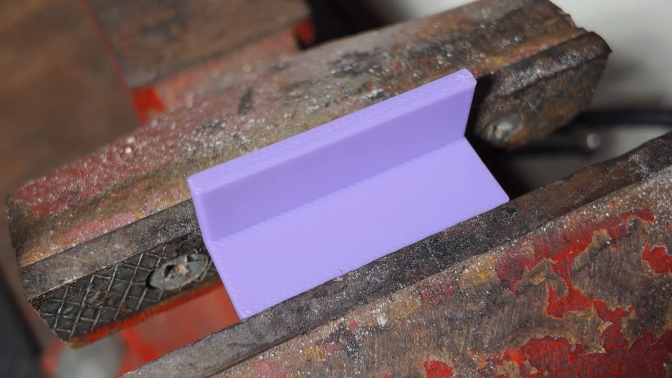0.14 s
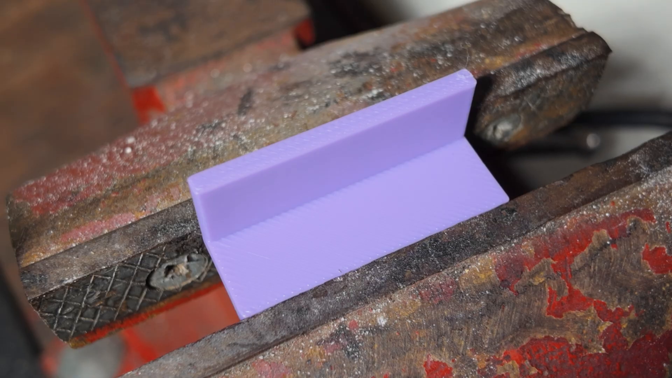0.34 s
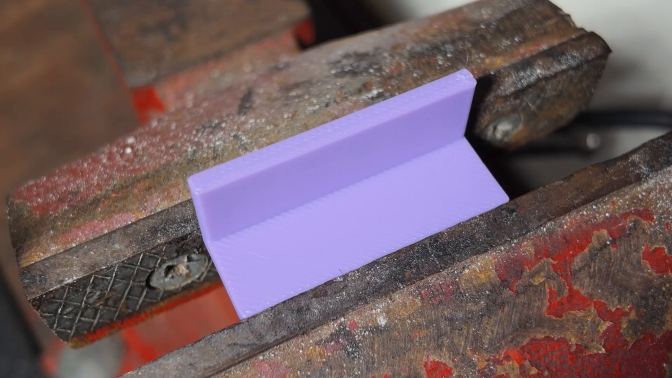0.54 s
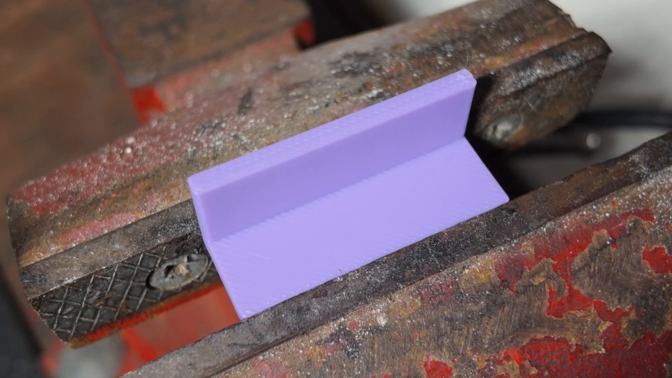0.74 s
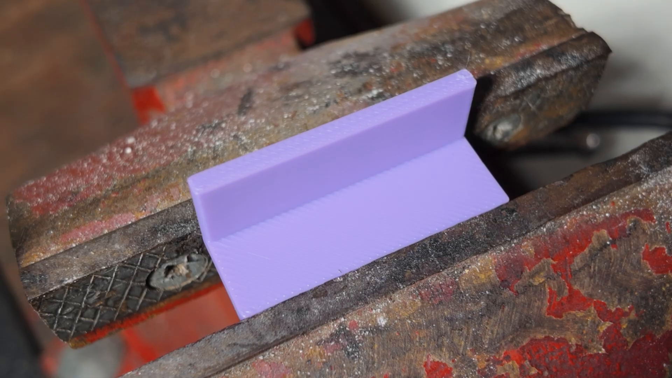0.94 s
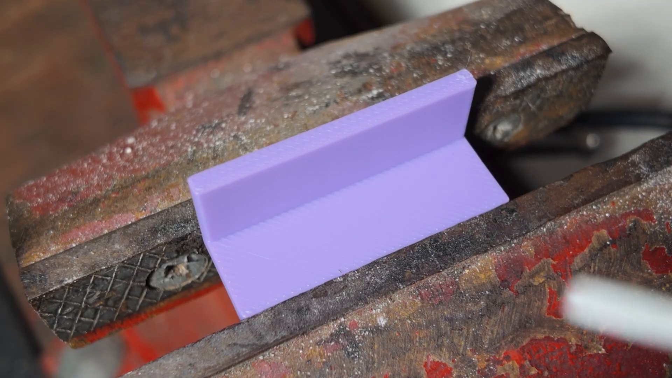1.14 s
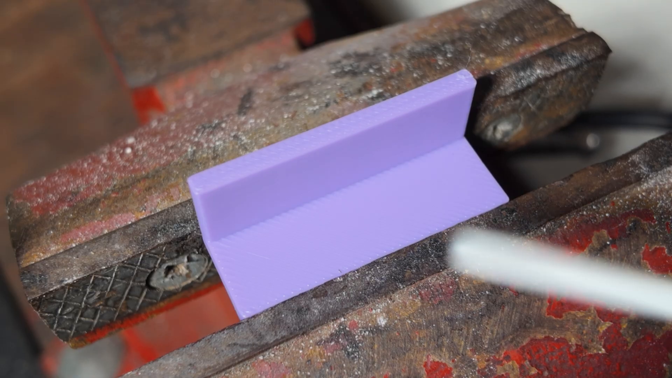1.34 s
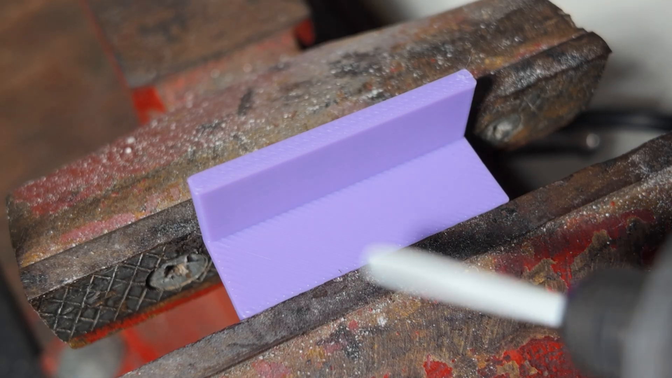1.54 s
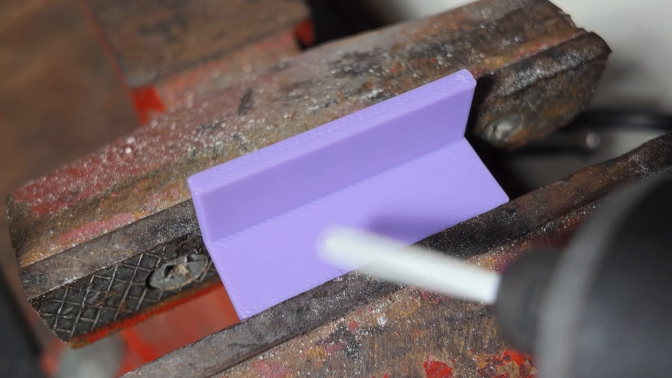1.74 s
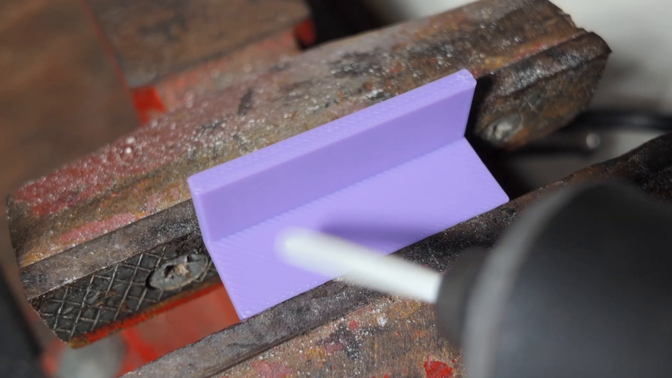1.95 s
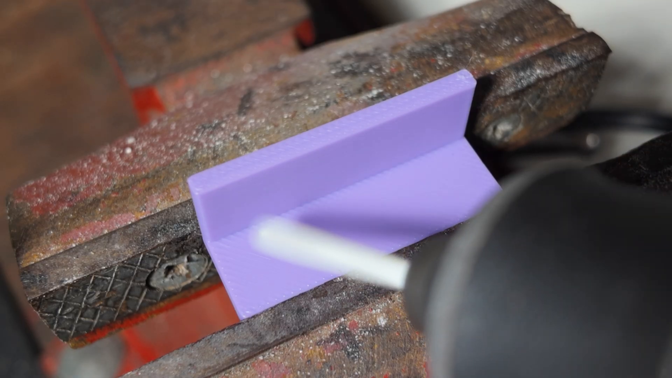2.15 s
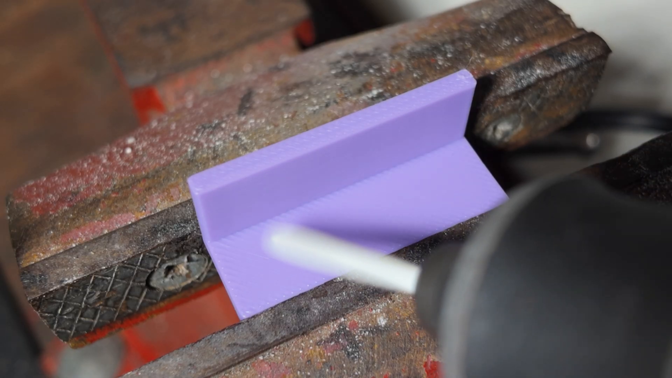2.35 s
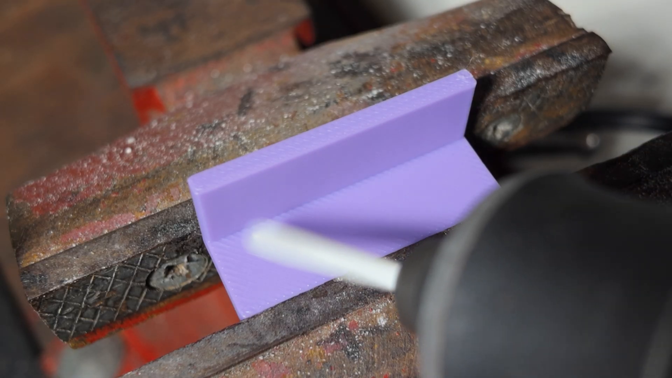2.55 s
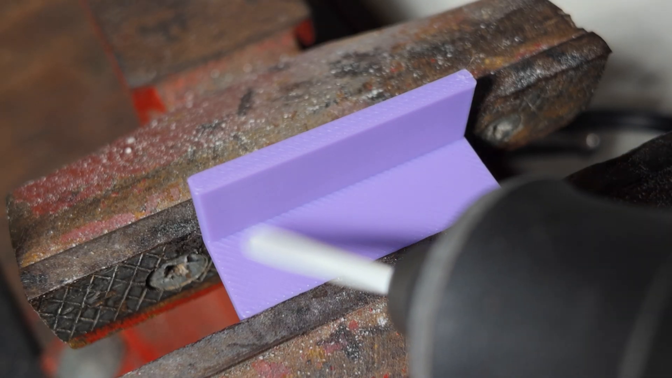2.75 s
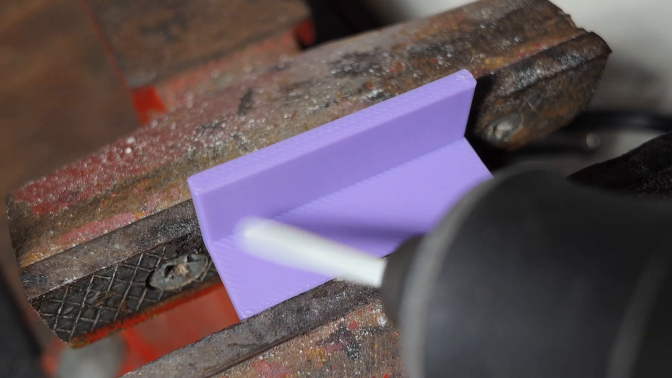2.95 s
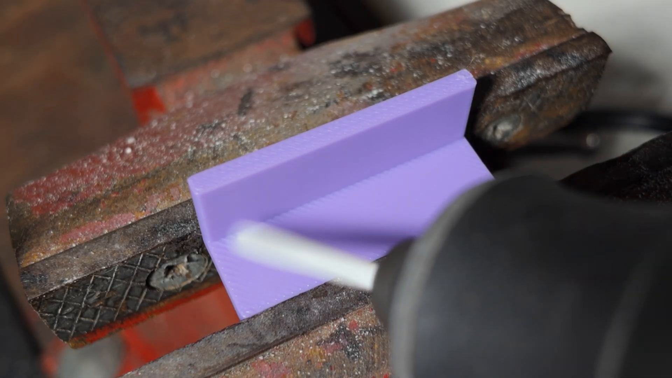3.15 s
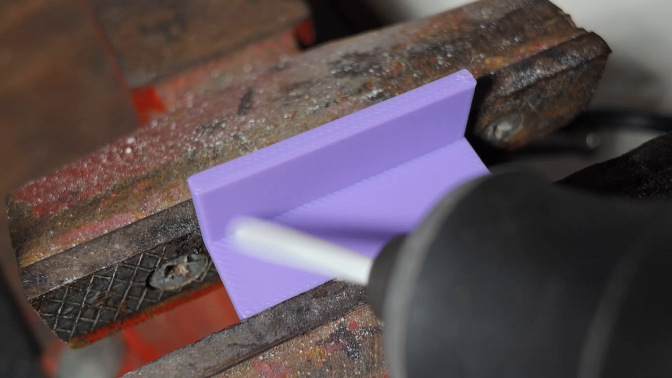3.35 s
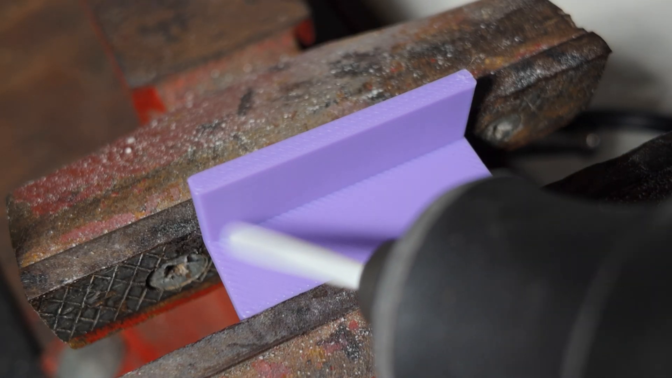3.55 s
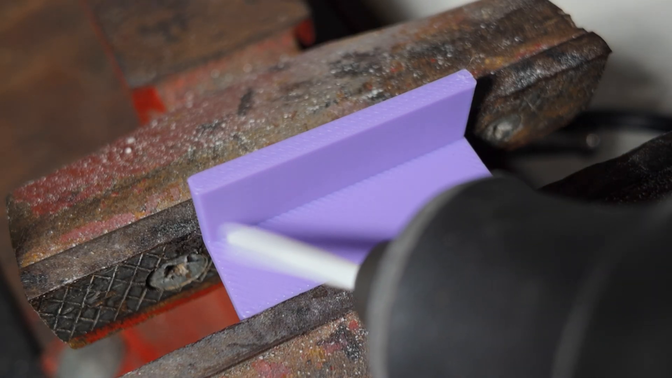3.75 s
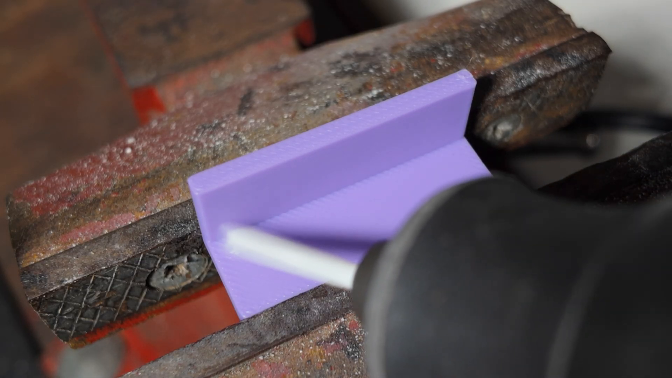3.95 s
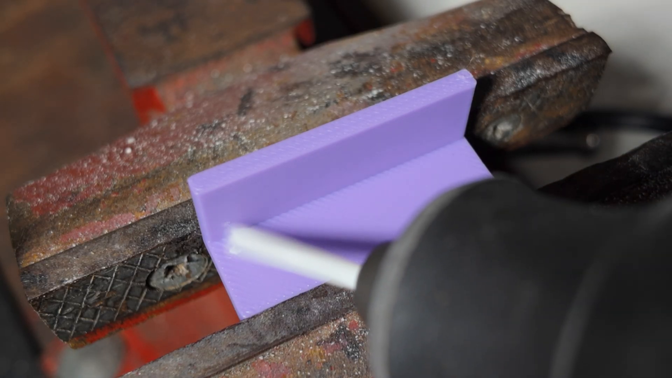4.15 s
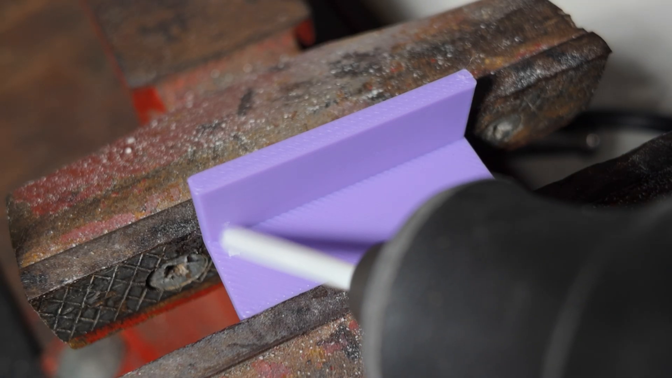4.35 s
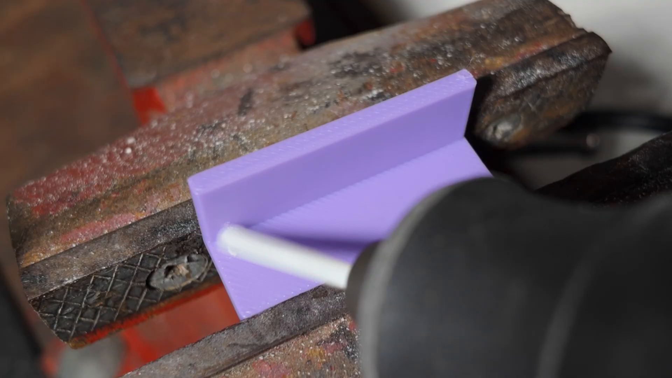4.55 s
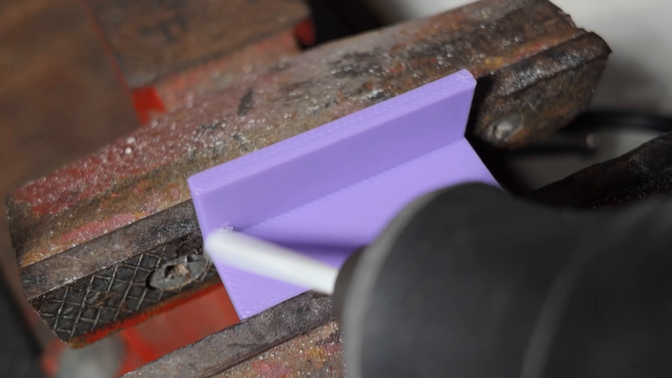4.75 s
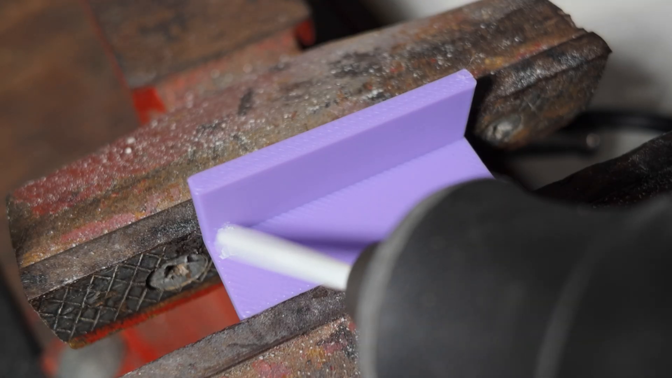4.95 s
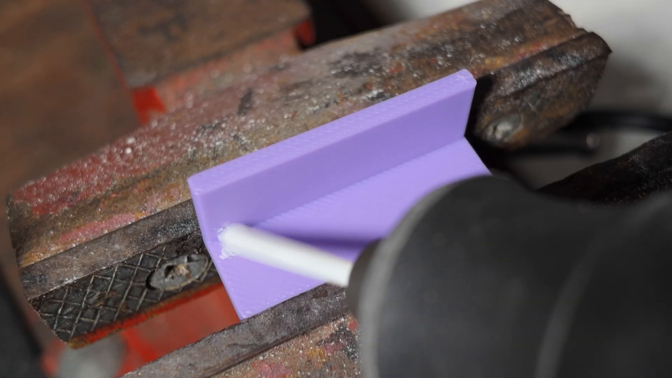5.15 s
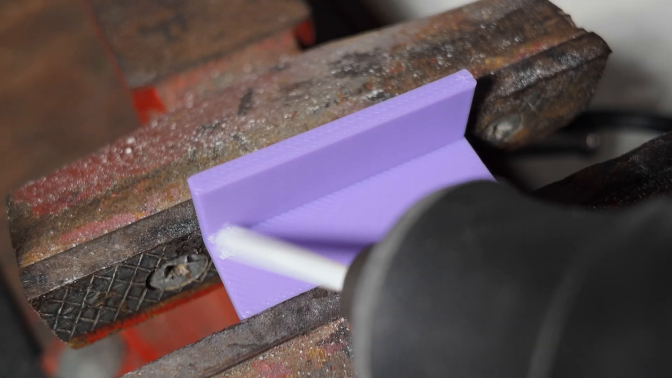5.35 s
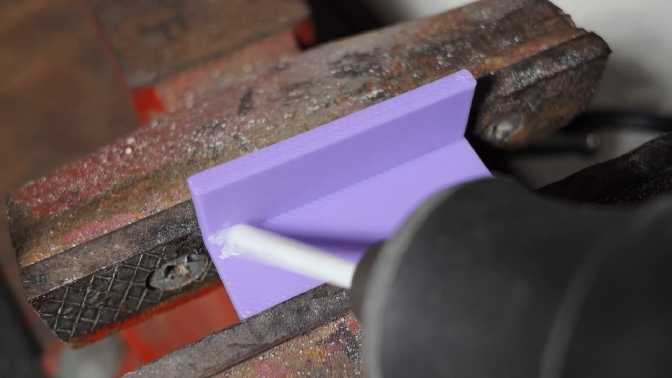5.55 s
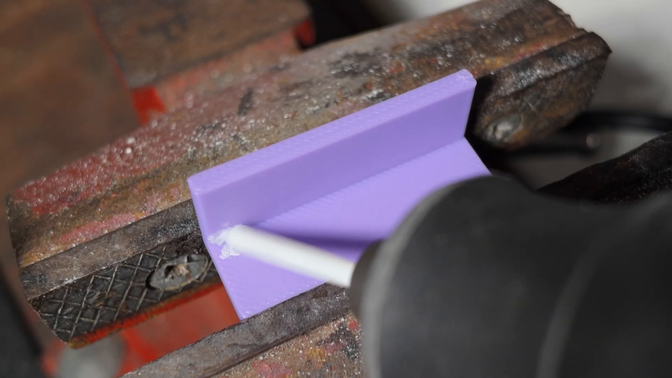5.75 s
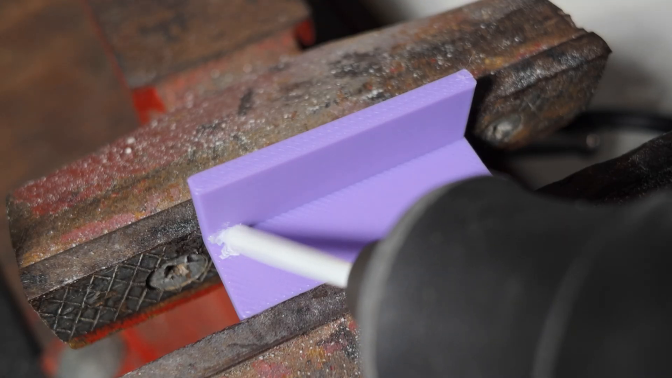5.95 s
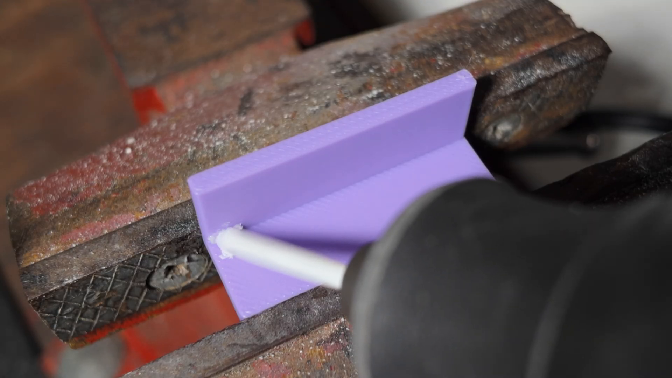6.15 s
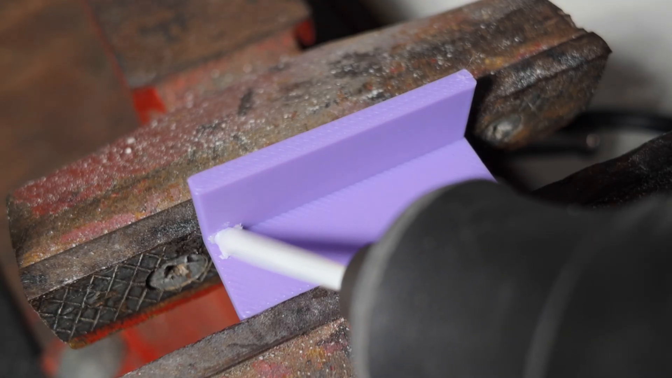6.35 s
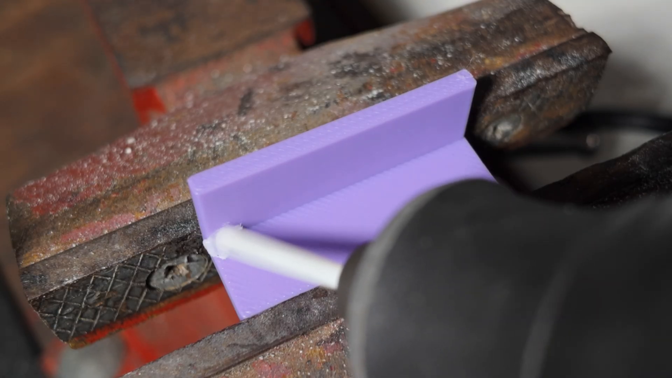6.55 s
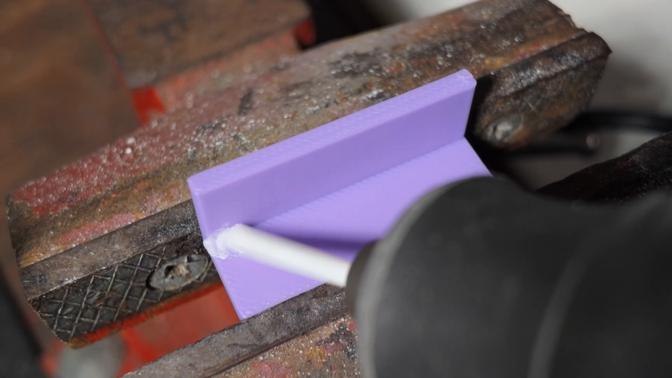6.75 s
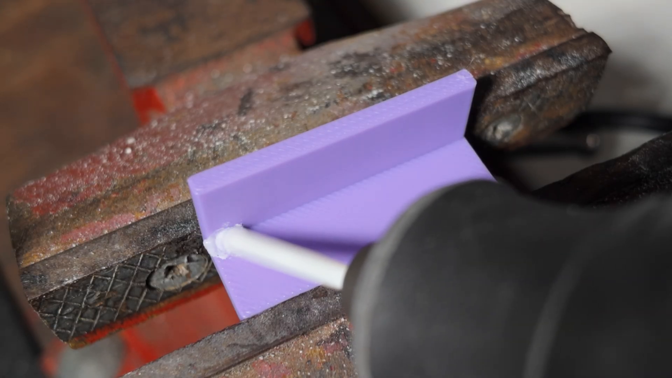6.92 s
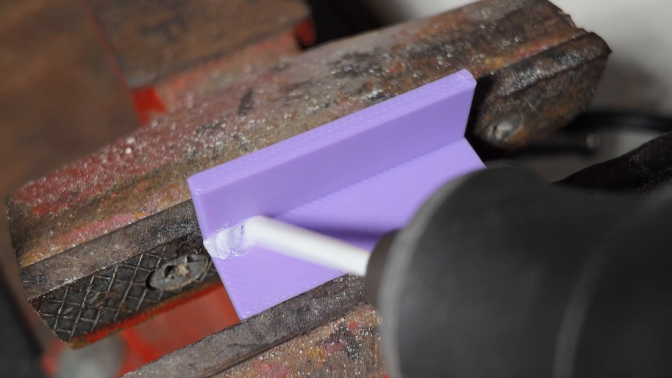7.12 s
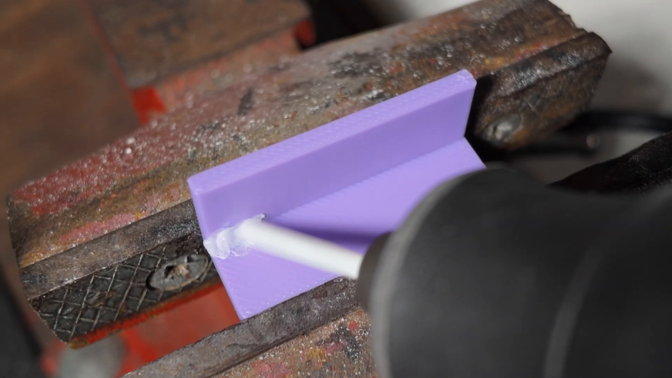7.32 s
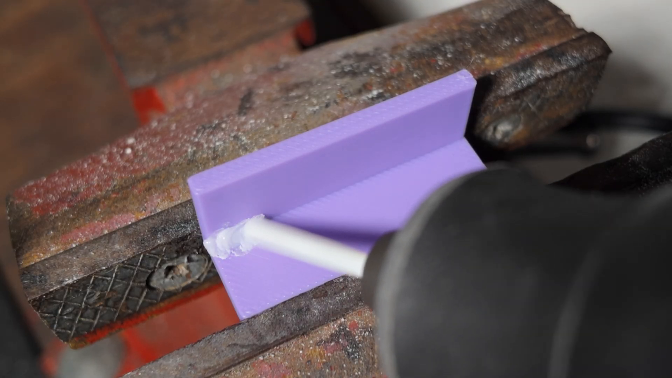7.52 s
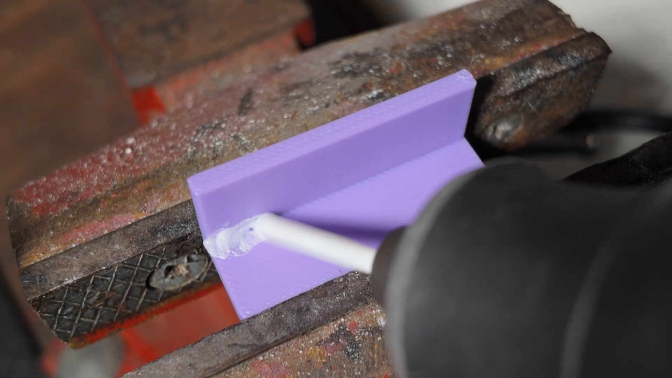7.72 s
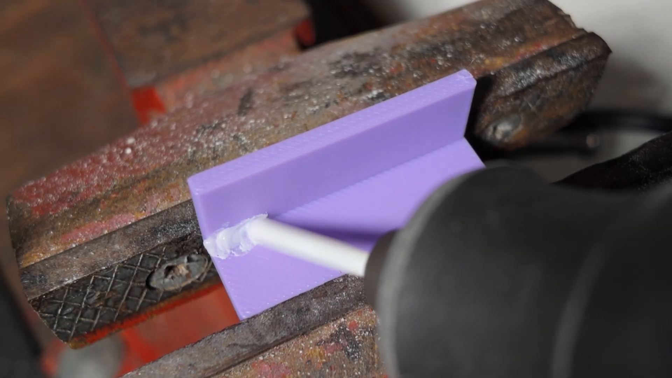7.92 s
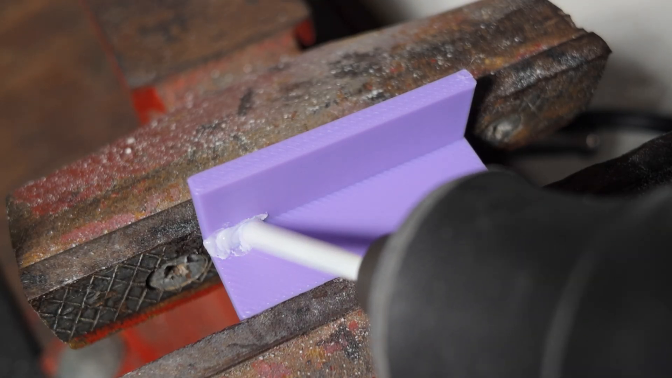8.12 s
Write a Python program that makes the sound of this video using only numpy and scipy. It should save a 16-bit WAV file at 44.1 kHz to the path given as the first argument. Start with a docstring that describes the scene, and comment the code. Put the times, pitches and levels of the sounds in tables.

```python
"""Rotary tool and plastic rod

A handheld rotary tool is gripped, clicked on and runs up to speed, close by in a quiet workshop.
Its speed control feeds the motor in bursts, twice a mains cycle, so the whine buzzes; its fan rushes.
The spinning plastic rod is pressed on a part in a vise: it squeals and scrapes, then softens and runs smoothly.
Tones are sines locked to the shaft's angle, rung through resonances; air and friction are filtered noise."""
import sys
import numpy as np
from scipy.fft import rfft, irfft, next_fast_len
from scipy.io import wavfile
from scipy.ndimage import uniform_filter1d, map_coordinates

SR = 44100
rng = np.random.default_rng(int(sys.argv[2]) if len(sys.argv) > 2 else 0)


def pcm_store(signal):
    """Save signal as 16-bit PCM."""
    levels = np.round(np.clip(np.atleast_2d(signal), -1, 1) * 32767)
    wavfile.write(sys.argv[1], SR, levels.astype(np.int16).T)


N = 365148

# governed shaft speed, sagging under the load: t/s, f/Hz (turns per second)
SPEED = [(1.05, 341.1), (1.39, 330.8), (1.57, 331.5), (1.77, 328.9), (1.93, 330.9), (2.24, 329.3),
         (2.4, 330.5), (2.78, 329.2), (2.82, 330.8), (3.06, 332.4), (4.05, 329.7), (4.19, 332.5),
         (4.41, 328.7), (5.01, 328.7), (5.34, 325.4), (5.7, 328.2), (5.86, 326.2), (5.96, 327.7),
         (6.18, 326.6), (6.39, 323.4), (7.01, 326.2), (7.05, 327.6), (7.21, 323.6), (7.31, 323.0),
         (7.73, 322.9), (7.85, 325.7), (7.92, 323.4), (8.06, 324.2), (8.28, 322.8)]
MAINS_HZ = 59.97
POWER_S = .6  # the motor is switched on


def amp(db):
    """Level in decibels to amplitude ratio, 20 dB per factor of ten."""
    return 10 ** (np.asarray(db) / 20)


def unit(x):
    """Normalisation to an rms of 1 over the whole signal."""
    return x / np.sqrt(np.mean(x ** 2) + 1e-20)


def steady(x, size=1470):
    """Normalisation to a running rms of 1, its power averaged twice over size samples."""
    power = uniform_filter1d(uniform_filter1d(x ** 2, size), size)
    return x / np.sqrt(np.abs(power) + 1e-6 * np.mean(x ** 2))


def clock():
    """Sampled time axis, in seconds."""
    return np.arange(N) / SR


def curve(rows):
    """Linear interpolation of (t/s, value) rows at every sample."""
    return np.interp(clock(), *np.transpose(rows))


def level(rows):
    """Amplitude envelope from (t/s, level/dB) rows, silent before the first row."""
    return amp(np.interp(clock(), *np.transpose(rows), left=-140))


def fade(db_per_s):
    """Exponential decay of amplitude, starting when the motor is switched on and zero before."""
    return (clock() > POWER_S) * amp(-db_per_s * (clock() - POWER_S))


def wobble(rate):
    """Smooth random fluctuation: a spline through rate random knots a second."""
    knots = rng.standard_normal(int(N * rate / SR) + 4)
    coarse = np.arange(0, N + 32, 32)
    values = map_coordinates(knots, [coarse * rate / SR])
    return np.interp(np.arange(N), coarse, values)


def coloured(x, points):
    """Minimum-phase (causal) filter whose gain follows (f/Hz, level/dB) points."""
    m = next_fast_len(N + SR // 2, True)
    m += m % 2
    f, db = np.transpose(points)
    gain_db = np.interp(np.log(np.fft.rfftfreq(m, 1 / SR) + 1), np.log(f), db)
    # folding the cepstrum onto positive times makes the response causal
    cepstrum = irfft(np.log(amp(gain_db)), m)
    cepstrum[1:m // 2] *= 2
    cepstrum[m // 2 + 1:] = 0
    response = np.exp(rfft(cepstrum))
    return irfft(rfft(x, m) * response, m)[:N]


def noise(points):
    """Gaussian noise shaped by a filter, of rms 1."""
    return unit(coloured(rng.standard_normal(N), points))


def shaft_speed():
    """Uniform angular acceleration, eased by a parabola into the governed speed."""
    start_s, accel_hz_per_s = .643, 1020
    ease_hz, creep_hz = 78, 12  # easing starts this far below full speed; slowest creep
    governed = curve(SPEED)
    ramp = np.clip(accel_hz_per_s * (clock() - start_s), creep_hz, governed + ease_hz)
    overshoot = np.maximum(ramp - governed + ease_hz, 0)
    return ramp - overshoot ** 2 / (4 * ease_hz)


def current(leak):
    """Phase control: one hump of current passes, up to the end of each half of a mains cycle."""
    # share of each half cycle in which current flows, widest in the run-up: t/s, share (0-1)
    duty = [(.72, 0.56), (.8, 0.66), (.88, 0.63), (.97, .72), (1.06, 0.58)]
    left = (.26 - 2 * MAINS_HZ * clock()) % 1  # share of the half cycle still to come
    hump = np.minimum(left / np.clip(curve(duty), .1, 1), 1)
    return leak + np.sin(np.pi * hump) ** 2


def whine(angle, drive):
    """Magnetic slot passing: eight armature slots are pulled as current flows, exciting housing resonance."""
    # whine level ahead of the waver and trim below, swelling twice in the run-up: t/s, level/dB
    whine_level = [(0.67, -67), (0.72, -52.5), (0.816, -37), (0.87, -44.5), (0.974, -28.5), (1.08, -37.5),
                   (2.0, -35.5), (3.3, -38.5), (4.35, -37.5), (5.15, -38.5), (5.38, -40.5), (5.58, -38),
                   (6.68, -38), (6.8, -41.5), (6.95, -38.5), (8.28, -37.5)]
    # resonances of the housing: f/Hz, level/dB
    housing = [(300, -98), (1000, -22), (1300, -5.5), (1700, -15), (2000, -13), (2300, 6), (2390, 2.5),
               (2480, 10.5), (2610, 7), (2760, -0.5), (2900, 4), (3050, -1.5), (3300, -6), (4000, -14.5),
               (5300, -11), (9000, -52)]
    relief_db_per_hz, relief_limit_hz, relief_s = 1.0, 2.9, 0.37
    pull = np.sin(8 * angle) + amp(-7) * np.sin(16 * angle)
    pull += amp(-19) * np.sin(24 * angle) + amp(-22) * np.sin(32 * angle)
    ring = coloured(pull * drive * amp(0.18 * wobble(120)), housing)
    # running faster than its moving average, the motor draws less current and the whine dips
    governed = curve(SPEED)
    average = uniform_filter1d(governed, int(relief_s * SR))
    surplus = np.clip(governed - average, 0, relief_limit_hz)
    waver_db = .6 * wobble(14)
    return level(whine_level) * steady(ring) * amp(1.52 - relief_db_per_hz * surplus + waver_db)


def whistle(angle, pace):
    """Periodic impact tone: 24 commutator bars whistle past the brushes from half speed up."""
    # whistle level ahead of the onset and trim below: t/s, level/dB
    whistle_level = [(1.0, -47.5), (1.3, -46.5), (1.4, -57), (1.63, -46), (1.77, -67), (1.79, -48.5),
                     (2.03, -58), (2.82, -48.5), (2.97, -62), (3.11, -53.5), (3.78, -48), (4.99, -51),
                     (5.11, -65), (5.3, -56.5), (8.12, -55), (8.28, -51)]
    onset = pace * np.clip((pace - .5) / 0.15, 0, 1)
    tone = np.sin(24 * angle + .15 * wobble(87))
    return onset * tone * amp(curve(whistle_level) + 2.6 + 2.0 * wobble(25))


def drone(angle, pace, pressure, grab_drone):
    """Shaft-order vibration: the third order drones; pressure swells it and adds a growl of other orders."""
    # how much the rod shakes the shaft: t/s, share (0-1)
    shake = curve([(3.6, 0.6), (4.2, 1), (5.8, 1), (7, 0.8)])
    # lines of the growl: multiple of the shaft speed, relative level/dB
    growl_lines = [(2, 0), (4, 1), (5, -2), (6, -1)]
    drone_db, press_db, fade_db_per_s = -51, 12.5, .5  # running free; added at full pressure; fade
    growl_db, ring_db = -65.5, -7.5  # growl; the drone's own third harmonic relative to the drone
    growl_from, growl_full = .15, .45  # pressures at which the growl sets in and is fully there
    loaded = np.clip((pressure - growl_from) / (growl_full - growl_from), 0, 1)
    running = pace ** 14 * fade(fade_db_per_s) * amp(drone_db + press_db * pressure + 1.4 * wobble(12))
    phase = 3 * angle + 0.44 * shake * wobble(60)
    tone = np.sin(phase) + loaded * amp(ring_db) * np.sin(3 * phase)
    swell = np.hypot(running, grab_drone) * amp(2.37 * shake * wobble(35))
    growl = sum(amp(growl_db + db + 5.6 * wobble(30)) * np.sin(order * angle) for order, db in growl_lines)
    return np.sqrt(2) * (swell * tone + loaded * growl)  # root 2 turns rms into sine peak


def hum(angle):
    """Rotating unbalance: a sine at the shaft speed, entering as full speed is reached."""
    # hum level ahead of the trim below: t/s, level/dB
    hum_level = [(1.1, -57.5), (2.86, -68.5), (3.18, -63), (3.8, -69.5), (4.22, -64), (6.1, -80.5),
                 (7.7, -72), (8.28, -79)]
    onset = np.interp(clock(), [.98, 1.1], [0, 1])
    return onset * np.sin(angle) * amp(curve(hum_level) + 2.5 + 1.2 * wobble(18))


def overtones(angle, pace):
    """Order spectrum: the bearing sings at first, then fades; weak lines waver on the shaft's multiples."""
    # bearing and brush lines ahead of pace and trim: multiple of the shaft speed, level/dB
    orders = [(2, -72), (4, -68), (5, -74), (6, -71), (11, -66), (12, -65), (13, -67), (16, -61), (17, -64),
              (18, -59), (19, -58), (20, -59), (21, -63), (22, -63), (23, -69), (25, -70), (26, -79),
              (27, -75), (28, -77), (29, -72), (30, -75), (31, -79), (32, -72), (33, -80), (34, -79),
              (35, -77), (36, -76), (37, -82), (40, -81), (48, -80)]
    bearing_db, fade_db_per_s = -52, 6
    balls = np.sin(11 * angle) + .5 * np.sin(12 * angle)
    bearing = pace ** 10 * amp(bearing_db) * fade(fade_db_per_s) * balls
    lines = np.zeros(N)
    for order, db in orders:
        drift = .5 * wobble(18) + rng.uniform(0, 2 * np.pi)
        lines += amp(db + 1.8 * wobble(12)) * np.sin(order * angle + drift)
    return np.sqrt(2) * (bearing + amp(0.03) * pace ** 4 * lines)


def mains_hum():
    """Magnetic hum: the chopped current moves the field coils at even multiples of the mains."""
    cycle = 2 * np.pi * MAINS_HZ * clock()
    second, fourth, sixth = np.sin(2 * cycle), np.sin(4 * cycle), np.sin(6 * cycle)
    gain = curve([(.6, 0.11), (1, 0.75)])
    return gain * (amp(-90.5) * second + amp(-86) * fourth + amp(-71.5) * sixth)


def grabs():
    """Stick-slip bursts: envelopes of squeal and drone as the tip grabs briefly and shakes the shaft."""
    # each grab: start t/s, length/s, squeal level/dB, drone level/dB
    grab_rows = [(3.544, 0.11, -38, -50), (4.43, .055, -42.5, -44), (4.568, 0.024, -41.5, -47),
                 (4.65, 0.038, -45, -45), (4.785, 0.034, -44, -68), (4.893, 0.024, -40.5, -41.5),
                 (5.07, 0.071, -46, -69), (5.473, 0.045, -46, -46), (5.688, 0.045, -49, -48)]
    attack_s, release_s = 0.0077, 0.0081
    squeal, drone_gain = np.zeros(N), np.zeros(N)
    for s, length, squeal_db, drone_db in grab_rows:
        corners = [s - attack_s, s, s + length, s + length + release_s]
        shape = np.interp(clock(), corners, [0, 1, 1, 0])
        squeal += amp(squeal_db) * shape
        drone_gain += amp(drone_db) * shape
    return squeal, drone_gain


def rubbing(angle, grab_squeal):
    """Friction-excited resonance: the tip catches once a turn, rings near 5 kHz and turns ragged as it tears."""
    # long squeal, fading as the plastic softens: t/s, level/dB
    rub_level = [(3.71, -56), (3.78, -36), (3.98, -35), (4.12, -37), (4.27, -41), (4.44, -42.5),
                 (4.52, -48), (5.0, -50), (5.8, -75)]
    # roughness of the contact: t/s, share (0-1)
    rough = np.clip(curve([(3.55, .12), (3.7, .1), (3.78, .35), (4.0, .5), (4.4, .65), (5.5, .95)]), 0, 1)
    # resonances of the rod: f/Hz, level/dB
    rod = [(600, -64), (1300, -22), (1980, -16), (2300, -60), (3000, -38), (3800, -19), (4450, -11.5),
           (4630, -2), (4780, 3.5), (4950, 7), (5250, 4.5), (5500, -42), (6500, -12), (7200, -9),
           (8700, -16.5), (9600, -16), (10600, -26), (11400, -13), (12400, -24), (13200, -28), (15500, -32)]
    slip = angle + .06 * rough * wobble(70)
    catches = sum(np.cos(k * slip) for k in range(3, 23))  # a pulse train without its lowest orders
    clean = unit(coloured(catches, rod))
    catch = np.exp(2 * (np.cos(angle) - 1))
    chatter = amp(1.1 * wobble(110))
    ragged = unit(coloured(rng.standard_normal(N) * (catch + 0.63) * chatter, rod))
    friction = np.hypot(level(rub_level), grab_squeal) * amp(1.4 * wobble(60))
    return friction * (np.sqrt(1 - rough) * clean + np.sqrt(rough) * ragged)


def lumps():
    """Transient forcing: soft lumps of plastic drag under the tip and rumble through part and vise."""
    # each lump: t/s of its peak, level/dB, time/s to fall to 1/e of the peak
    lump_rows = [(4.268, -62, 0.063), (4.47, -55, 0.015), (4.57, -60, .04), (4.653, -61, 0.027),
                 (4.747, -67, 0.053), (4.864, -58.5, 0.095), (5.025, -60, 0.027), (5.2, -61, 0.042),
                 (5.513, -62, 0.042), (6.696, -64, .03), (7.626, -63, 0.038)]
    # colour of part and vise: f/Hz, level/dB
    vise = [(30, -57), (70, -22), (160, -7), (280, 1), (500, 8), (850, 7), (1300, 0.5), (2200, -20),
            (9000, -58)]
    drag = sum(amp(db) * np.exp(-((clock() - s) / length) ** 2) for s, db, length in lump_rows)
    return drag * amp(2.7 * wobble(80)) * noise(vise)


def air(angle, drive, pace, pressure):
    """Turbulent flow: fan and vents give noise; the brush hiss swells once a turn and with each current hump."""
    # colours of fan rush, brush hiss and vent rush: f/Hz, level/dB
    fan_colour = [(30, -52), (70, -40), (150, -27), (220, -30), (330, -18.5), (450, -10.5), (620, -14.5),
                  (800, -13.5), (1050, 4), (1350, 0), (1620, -5.5), (1790, -19), (1950, -7.5), (2130, -10),
                  (2450, 0.5), (2900, 0.5), (3300, -3.5), (4200, -13.5), (7000, -44.5)]
    brush_colour = [(1500, -58), (3000, -0.5), (3800, -11), (4400, -2), (4900, -9.5), (5600, 2), (6300, 4),
                    (7100, -2), (8400, -13), (9500, -12), (10800, -17.5), (11800, -21.5), (13000, -23),
                    (15700, -39)]
    vent_colour = [(150, -38), (240, -16.5), (450, -25.5), (660, -9), (1000, -12.5), (1800, -3.5),
                   (2400, -17), (3400, -35), (4300, -5.5), (4800, 1.5), (5600, 0), (7500, -26)]
    # levels at full speed at switch-on, unloaded; the fades follow the tool turning away
    fan_db, fan_power, fan_fade_db_per_s, fan_press_db = -48, 0.68, .5, 5
    brush_db, brush_power, brush_fade_db_per_s, brush_press_db = -47, 1, 0.08, 4
    vent_db, vent_power, vent_fade_db_per_s = -46, 1.5, 3
    fan = pace ** fan_power * fade(fan_fade_db_per_s)
    fan *= amp(fan_db + fan_press_db * pressure + 0.21 * wobble(10))
    brushes = pace ** brush_power * fade(brush_fade_db_per_s) * amp(brush_db + brush_press_db * pressure)
    vents = pace ** vent_power * fade(vent_fade_db_per_s) * amp(vent_db)
    rush = noise(fan_colour) * unit(1 + 0.037 * drive)
    hiss = noise(brush_colour) * unit((1 + 0.13 * np.sin(angle)) * (1 + 0.1 * drive))
    return fan * rush + brushes * hiss + vents * noise(vent_colour)


def draught():
    """Low-frequency flow noise: a faint, decaying rumble as the fan's air sweeps past the listener."""
    # colour of the rumble: f/Hz, level/dB
    rumble_colour = [(25, -14), (60, 0), (110, 5), (400, -38)]
    start_s, attack_s, decay_s, draught_db = 1.05, 0.038, 0.99, -85
    since = clock() - start_s
    envelope = np.clip(since / attack_s, 0, 1) * np.exp(-since / decay_s)
    return amp(draught_db) * envelope * noise(rumble_colour)


def switch():
    """Impulse response: the slide switch snaps through its detent in a few short band-limited ticks."""
    # contacts: t/s, peak level/dB, centre f/Hz, bandwidth/Hz
    contacts = [(.554, -45, 4120, 600), (0.554, -55, 6760, 1240), (0.591, -48, 6200, 2500),
                (.596, -37, 6000, 2320)]
    out, t = np.zeros(N), np.arange(SR // 10) / SR
    hz = np.fft.rfftfreq(len(t), 1 / SR)
    # a sharp snap, then a fast and a slow decay
    shape = np.exp(-((t - .0015) / .0011) ** 2) + amp(-15 - 60 * t / .025) + amp(-28 - 60 * t / .2)
    for s, db, pitch, width in contacts:
        band = 1 / (1 + ((hz - pitch) / width) ** 2) ** 2
        tick = shape * irfft(rfft(rng.standard_normal(len(t))) * band, len(t))
        out[round(s * SR):][:len(t)] += amp(db) * tick / np.abs(tick).max()
    return out


def background():
    """Stationary room noise, and dull bumps of noise as the hand settles on the tool."""
    # colours of the workshop air and of the hand: f/Hz, level/dB
    room = [(18, -87), (30, -49), (83, -4), (126, -14), (164, -4.5), (219, -7.5), (1440, -14.5),
            (2550, -28), (15500, -35)]
    hand = [(30, -37), (90, -21), (170, -15), (400, -23), (900, -24), (3000, -30), (6000, -33), (9000, -50),
            (14000, -60)]
    hand_db = curve([(0, -57), (.09, -59), (.2, -76), (.35, -92), (.6, -100)])
    bumps = amp(2.5 * wobble(45))
    return amp(-81) * noise(room) + amp(hand_db) * bumps * noise(hand)


def scene():
    """Superposition: shaft angle, chopped current and pressure on the rod drive the tool's sources."""
    # how hard the rod bears on the part: t/s, pressure (0-1)
    pressure_rows = [(3.299, 0.13), (3.72, 0.25), (4.13, 1), (4.23, 0.47), (4.7, 0.54), (5.2, 0.21),
                     (8.28, 0.02)]
    pressure = np.interp(clock(), *np.transpose(pressure_rows), left=0)
    speed = shaft_speed()
    pace = speed / curve(SPEED)  # share of the governed speed
    angle = 2 * np.pi * np.cumsum(speed * (1 + 0.00025 * wobble(12))) / SR
    drive = current(leak=0.012)
    grab_squeal, grab_drone = grabs()
    shaft = hum(angle) + drone(angle, pace, pressure, grab_drone) + overtones(angle, pace)
    motor = whine(angle, drive) + whistle(angle, pace) + shaft + mains_hum()
    contact = rubbing(angle, grab_squeal) + lumps()
    cooling = air(angle, drive, pace, pressure) + draught()
    return (motor + contact + cooling + switch() + background())[None]


def record(dry):
    """Band limitation: nothing is kept above the top frequency."""
    top_hz = 15720
    m = next_fast_len(N + SR // 2)
    kept = np.fft.rfftfreq(m, 1 / SR) < top_hz
    return irfft(rfft(dry, m) * kept, m)[..., :N]


dry = scene()
out = record(dry)
pcm_store(out)
```